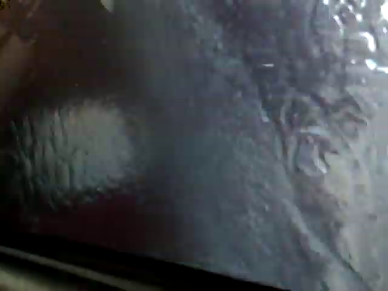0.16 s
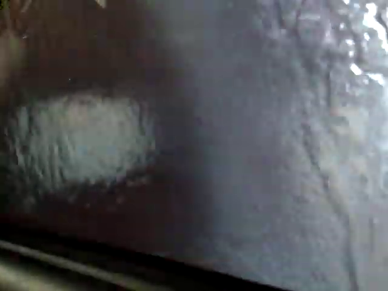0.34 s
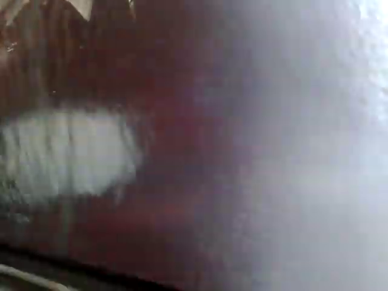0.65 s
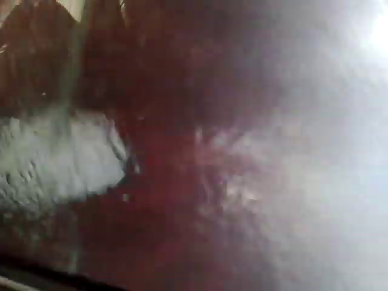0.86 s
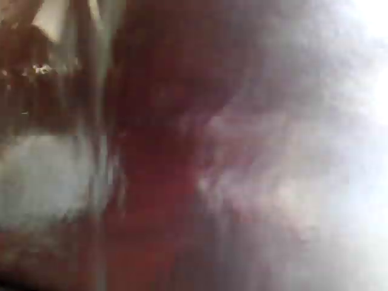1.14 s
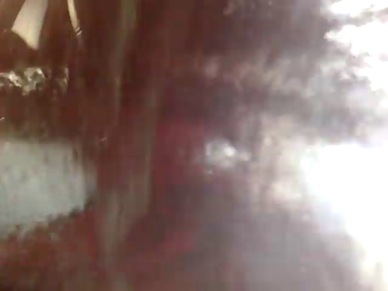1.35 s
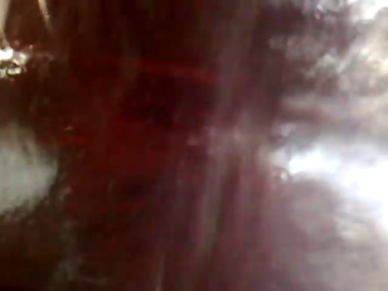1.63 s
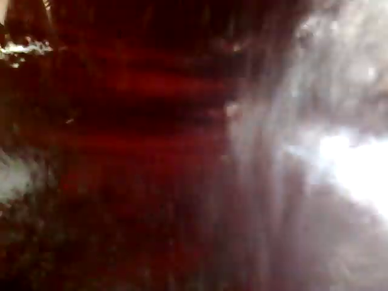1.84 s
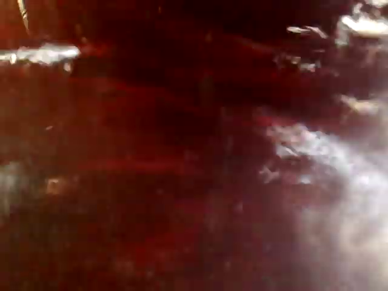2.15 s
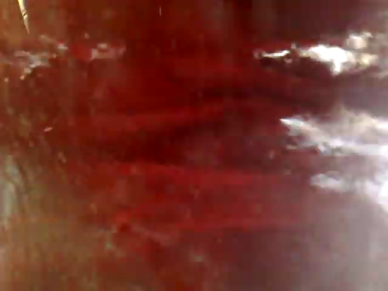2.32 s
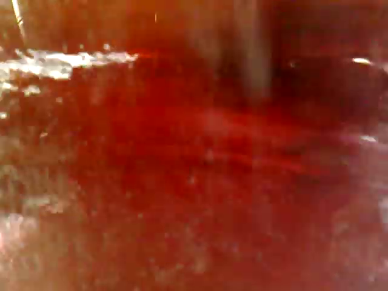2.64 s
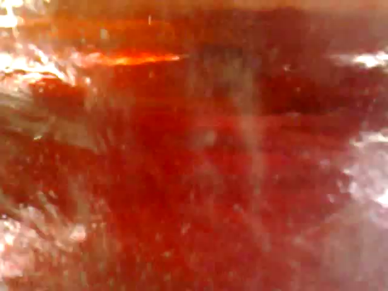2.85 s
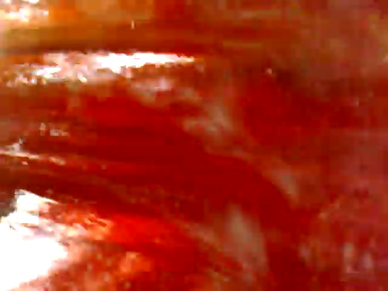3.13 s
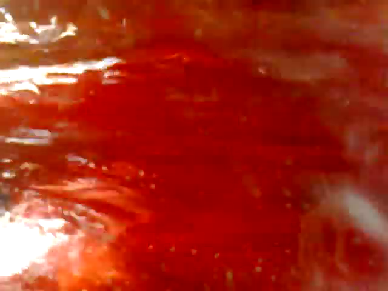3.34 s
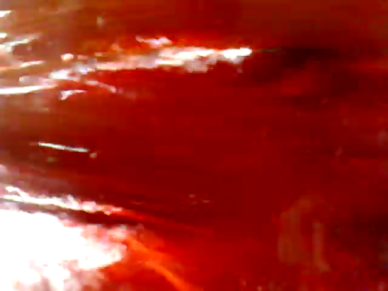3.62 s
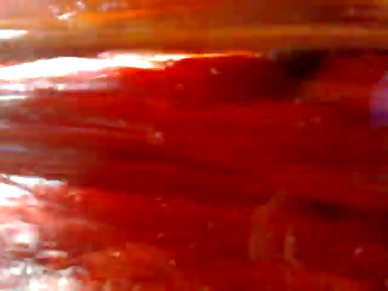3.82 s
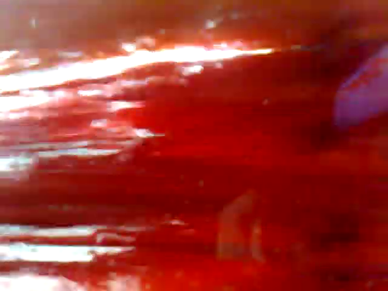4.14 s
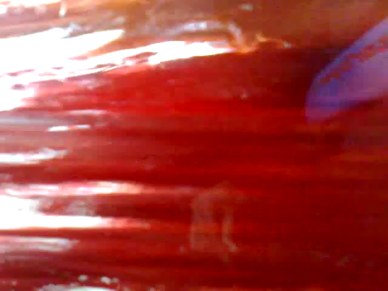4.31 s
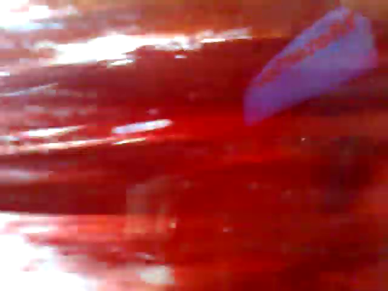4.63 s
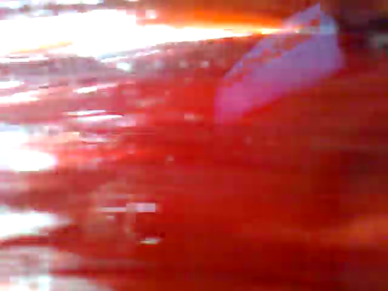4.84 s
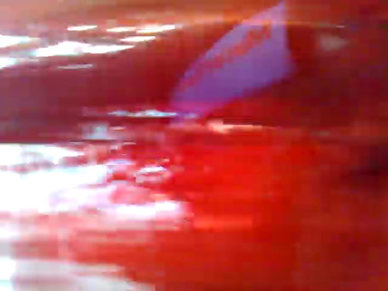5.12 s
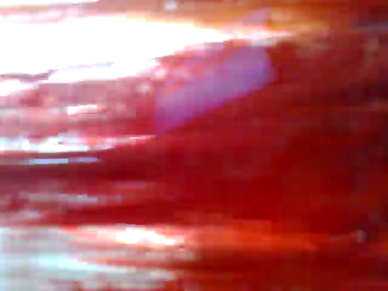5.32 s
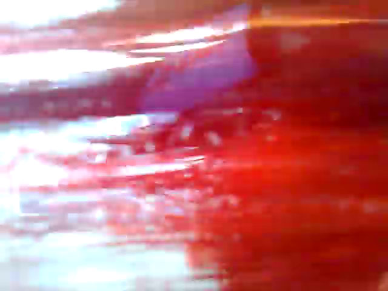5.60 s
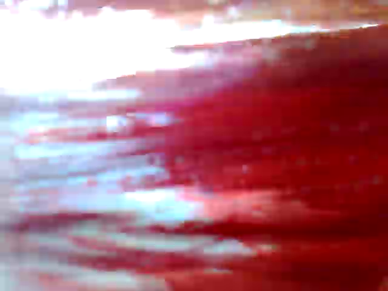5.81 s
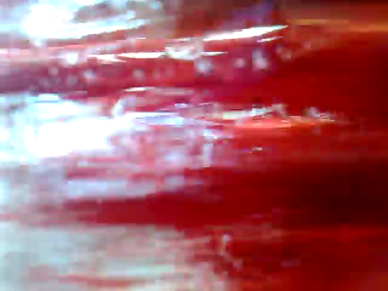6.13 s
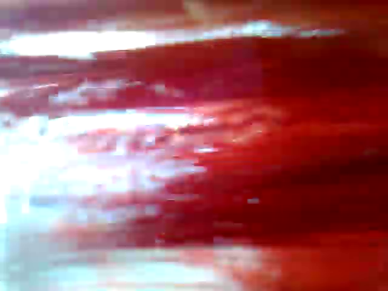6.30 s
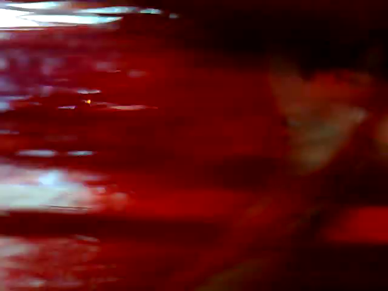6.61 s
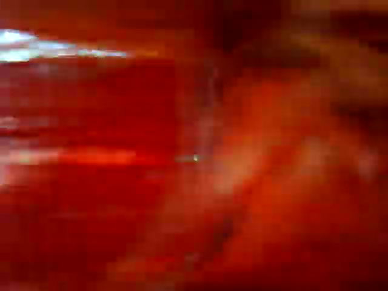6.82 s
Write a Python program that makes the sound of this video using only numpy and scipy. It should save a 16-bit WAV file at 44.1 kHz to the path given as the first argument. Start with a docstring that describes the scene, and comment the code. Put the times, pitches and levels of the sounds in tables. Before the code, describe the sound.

Inside a closed car in an automatic wash, heard through a small, overloaded, narrow-band microphone. A jet blasts the windscreen at first, with splashes and a low boom, until about 0.23 s, when the sound drops almost to silence, clicks faintly and swells back by 0.4 s. From then on it is a steady loud roar: cloth strips beating some twenty-two times a second, blurred into a flutter, drumming on doors and glass while heavy drops and fine spray pelt down. Panels groan in unsteady low tones around 0.7, 1.7, 2.7 and 3.4 s. The deep rumble and cabin boom grow heavier around 3.5 s, with another drone near 4.7 s. From about 5 s the roof rings more strongly, a higher hum wavers, and sharp splashes cluster from 5.7 to 6.7 s. The roar continues to the end, thinly crackling, with a stronger drone around 6.85 s.

```python
"""Inside a car wash

An automatic car wash heard from inside the car. Spinning cloth brushes, as hails of tiny blows, boom the cabin
and ring the panels; filtered hails of drops make the water, random noise the rumble, wavering tones the drones.
A small narrow-band recorder is overloaded by the din; the sound drops out once near the start and swells back."""
import sys
import numpy as np
from scipy import signal
from scipy.fft import rfft, irfft, next_fast_len
from scipy.io import wavfile
from scipy.ndimage import uniform_filter1d

SR = 44100
rng = np.random.default_rng(int(sys.argv[2]) if len(sys.argv) > 2 else 0)


def output_pcm(signal):
    """Save a mono or channel-first signal as 16-bit PCM at the path in sys.argv[1].

    Samples are clipped to [-1, 1] before scaling.
    """
    pcm = np.clip(np.atleast_2d(signal).T, -1, 1) * 32767
    wavfile.write(sys.argv[1], SR, np.round(pcm).astype(np.int16))


N = 306936
TIME = np.arange(N) / SR  # s

# Tone colour of fine spray and splashes on glass: f/Hz, relative level per Hz/dB
SPRAY_COLOUR = [(600, -16.5), (1200, 0.5), (1700, 0.5), (2100, 1.5), (2500, 0.5), (2900, 1.5), (3250, 4.5),
                (3600, -6), (5000, -6)]

# At first a jet plays straight on the windscreen and the brushes stand off: end in s, level changes in dB
JET_END_S = 0.25
JET_SPRAY_DB, JET_WASH_DB, JET_BOOM_DB, STAND_OFF_DB = 3, -2, 3.5, -4.5


def from_db(db):
    """Turn decibels into a plain multiplier."""
    return 10 ** (np.asarray(db) / 20)


def rms_one(x):
    """Scale a signal so that its average strength (rms) is 1."""
    return x / np.sqrt(np.mean(x ** 2) + 1e-20)


def in_time(rows):
    """Draw straight lines between the rows of a table, giving each column a value at every sample."""
    s, *columns = np.transpose(rows)
    return [np.interp(TIME, s, column) for column in columns]


def swell(middle, length):
    """Rise and fall once, smoothly, between 0 and 1; length is the whole hump in s."""
    return np.cos(np.pi * np.clip((TIME - middle) / length, -.5, .5))


def cycle(per_s, first_s):
    """Swing steadily between -1 and 1, with a peak at first_s."""
    return np.cos(2 * np.pi * per_s * (TIME - first_s))


def drift(rate):
    """Wander slowly at random with rms 1: noise smoothed twice above the rate in Hz."""
    step = 40  # samples between the slow values
    r = np.exp(-2 * step * np.pi * rate / SR)
    noise = rng.standard_normal(N // step + 2002)
    slow = signal.lfilter([1], [1, -2 * r, r * r], noise)[2000:]  # skip the filter's start
    return np.interp(np.arange(N) / step, np.arange(len(slow)), rms_one(slow))


def coloured(x, spectrum):
    """Filter a signal by a smooth curve of level against pitch, silent above its last row; rms 1."""
    hz, db = np.transpose(spectrum)
    size = next_fast_len(N)
    bins_hz = np.maximum(np.arange(size // 2 + 1) * SR / size, 1)
    gain = from_db(np.interp(np.log(bins_hz), np.log(hz), db, right=-100))
    return rms_one(irfft(rfft(x, size) * gain, size)[:N])


def impacts(per_s, spread_db):
    """Scatter a dense random hail of small blows of uneven size and either sign; rms 1."""
    sizes_db = spread_db * np.minimum(rng.exponential(1, N), 4)
    sizes = from_db(sizes_db) * rng.choice([-1, 1], N)
    return rms_one(sizes * (rng.random(N) < per_s / SR))


def resonate(x, hz, width):
    """Ring at one pitch; a narrower width in Hz rings longer."""
    r = np.exp(-np.pi * width / SR)
    feed = np.array([1, 0, -1]) * (1 - r * r) / 2
    return signal.lfilter(feed, [1, -2 * r * np.cos(2 * np.pi * hz / SR), r * r], x)


def panel(force, modes, skirt):
    """Ring several resonances side by side, a second, wider one taming the far sides of each; rms 1."""
    out = np.zeros(N)
    for hz, width, db in modes:
        # every blow lands somewhere else, so it drives each mode with a sign of its own
        ringing = resonate(force * rng.choice([-1, 1], N), hz, width)
        out += from_db(db) * resonate(ringing, hz, width * skirt)
    return rms_one(out)


def shell():
    """The car body rumbles under the weight of the brush, as deep noise that swells when the car is rocked."""
    # Colour of the rumble: f/Hz, relative level per Hz/dB
    rumble_colour = [(12, -12), (25, -4.5), (40, -8.5), (57, 1), (75, -6.5), (120, -18.5)]
    # Extra swells as the brush rocks the car: middle t/s, level/dB
    rocks = [(2.2, -25.5), (3.52, -28.5), (4.25, -32), (4.87, -27), (6.25, -32.5)]
    light_db, heavy_db = -35.5, -29.5  # before and after the brush bears on the car
    bears_on_s, bearing_s, rock_length_s = 3.5, 0.3, 0.4
    weight = .5 + .5 * np.tanh((TIME - bears_on_s) / bearing_s)
    jet = TIME < JET_END_S
    gain = from_db(light_db + weight * (heavy_db - light_db) + JET_BOOM_DB * jet)
    for middle, db in rocks:
        gain += from_db(db) * swell(middle, rock_length_s)
    return gain * coloured(rng.standard_normal(N), rumble_colour)


def water(slap, spray_db=-0.13, wash_db=3.0, wash_slap_db=1.3, spray_slap_db=0.52, flutter_db=0.75):
    """Heavy drops and fine spray pelt the glass as two coloured hails, thrown in pulses by the brush."""
    # Colour of the heavy drops: f/Hz, relative level per Hz/dB
    wash_colour = [(100, -17), (250, -4), (400, 4.5), (490, 2), (580, 0), (720, -0.5), (900, -0.5),
                   (1150, 0.5), (1350, -4), (1700, -7), (2500, -21.5), (4000, -32.5)]
    # Water sheeting down the glass, before the wash trim: t/s, level/dB
    sheeting = [(0.45, -13.5), (0.87, -15.5), (1.94, -15), (2.15, -15), (6.43, -16), (6.7, -14.5),
                (6.75, -18)]
    # Fine spray reaching the car, before the spray trim: t/s, level/dB
    flow = [(0.38, -18.5), (0.41, -18.5), (0.89, -21), (1.05, -18), (1.88, -19.5), (2.05, -18.5),
            (3.63, -19), (3.65, -21.5), (4.63, -18), (4.7, -20.5), (5.72, -17.5), (6.01, -18.5),
            (6.15, -17.5), (6.37, -20.5), (6.61, -18.5), (6.9, -19.5)]
    # Moments when the water lets up, or rises a touch where positive: middle t/s, change/dB
    lulls = [(5.81, -1), (5.98, -3.5), (6.38, 0.5), (6.87, -2.5)]
    lull_s = 0.13
    jet = TIME < JET_END_S
    surge_db = flutter_db * drift(24)
    for middle, db in lulls:
        surge_db += db * swell(middle, lull_s)
    wash_level_db = in_time(sheeting)[0] + wash_db + JET_WASH_DB * jet + wash_slap_db * slap
    wash = from_db(wash_level_db) * coloured(impacts(6000, 2.24), wash_colour)
    spray_level_db = in_time(flow)[0] + spray_db + JET_SPRAY_DB * jet + spray_slap_db * slap
    spray = from_db(spray_level_db) * coloured(impacts(7000, 2.47), SPRAY_COLOUR)
    return from_db(surge_db) * (wash + spray)


def splashes(rise_s=0.0011, decay_s=0.013, level_db=-6.0):
    """Single slugs of water burst on the window: spray noise that jumps up and dies at once."""
    # Slugs of water, before the common trim and the burst shape: start t/s, level/dB
    slugs = [(0.115, -2), (0.162, -2), (0.201, -2.5), (0.4357, -4), (0.628, -6), (2.731, -6.5), (2.774, -8),
             (3.3034, -8.5), (4.4154, -9), (5.685, -4.5), (5.725, -11), (5.87, -10), (5.905, -4.5),
             (6.131, -5.5), (6.43, -8.5), (6.548, -10.5), (6.674, -6)]
    burst = np.zeros(N)
    for start, db in slugs:
        age = np.maximum(TIME - start, 0)
        burst += from_db(db + level_db) * (1 - np.exp(-age / rise_s)) * np.exp(-age / decay_s)
    return burst * coloured(impacts(7000, 3.2), SPRAY_COLOUR)


def drones(waver=0.0231, rough_db=2.5, level_db=-1.5):
    """Dragging cloth sticks and slips, so a panel sings one tone, unsteady in pitch and strength."""
    # Singing panels, before the common trim: middle t/s, length/s, central f/Hz, level/dB
    drags = [(0.681, 0.7, 260.4, -16.5), (1.6, 0.6, 146.8, -16.5), (1.798, 0.4, 275.8, -14.5),
             (2.747, 0.56, 148, -19), (3.399, 1, 141.9, -19), (3.4, 1, 98.8, -24),
             (4.687, 0.47, 116, -19.5), (6.148, 1.5, 333.1, -16), (6.85, 0.33, 318.6, -11.5)]
    out = np.zeros(N)
    for middle, length, hz, db in drags:
        phase = 2 * np.pi * np.cumsum(hz * (1 + waver * drift(10.0))) / SR
        tone = np.sqrt(2) * np.sin(phase + rng.uniform(0, 2 * np.pi))
        grip_db = rough_db * drift(hz / 20)  # the grip changes over some twenty cycles
        out += from_db(db + level_db + grip_db) * swell(middle, length) * tone
    return out


def brushes(slap, slap_db=1.2, boom_db=-1.0, roof_db=-0.5, glass_db=-0.76, roof_contrast=1.17,
            roof_full_db=-8.5):
    """Cloth tips set the cabin booming and hammer the doors, roof and glass, which ring at their own pitches."""
    # Colour of the cabin boom: f/Hz, relative level per Hz/dB
    boom_colour = [(50, -27), (75, -13.5), (98, -2), (120, -5.5), (150, -12.5), (250, -41)]
    # Resonances of each panel: f/Hz, width/Hz, relative level/dB
    door_modes = [(149.4, 31.7, -2), (191.3, 79, -2.5), (246.2, 74, 0)]
    roof_modes = [(307.5, 35, -6), (329.3, 42, 2), (391.6, 30, -5.5), (478, 90, -12.5), (912, 130, -13.5)]
    glass_modes = [(514, 60, -5), (660, 85, -2.5), (705, 66, 2), (793, 33, -5.5), (1184, 78, -9.5)]
    # Course of each part, before the trims: t/s, level/dB
    lean = [(0.55, -26), (1.98, -28.5), (2.02, -21.5), (3.63, -18), (4.37, -22.5), (4.39, -29), (4.65, -18),
            (4.99, -22.5), (6.74, -24), (6.9, -22)]  # the brush leans on the car and the cabin booms
    drumming = [(0.38, -11), (1.92, -9.5), (2.32, -18.5), (2.36, -15), (3.74, -11.5), (4.45, -15.5),
                (4.79, -12), (6.12, -20), (6.17, -15), (6.9, -20.5)]  # the cloth on the doors, working its way to the roof
    ringing = [(0.38, -16.5), (1.9, -16.5), (2.07, -19), (4.21, -12), (4.25, -18), (5.94, -8.5),
               (6.74, -10.5), (6.9, -9.5)]  # the cloth on the roof
    scrub = [(0.38, -12.5), (1.36, -12), (1.38, -13), (2.41, -19.5), (2.61, -12), (5.37, -17.5),
             (5.81, -21.5), (6.75, -17.5), (6.9, -21.5)]  # the cloth on the glass
    jet = TIME < JET_END_S
    beat = from_db(slap_db * slap)
    boom = from_db(in_time(lean)[0] + boom_db) * coloured(impacts(3000, 3.4) * beat, boom_colour)
    door = from_db(in_time(drumming)[0]) * panel(impacts(3000, 0.88) * beat, door_modes, skirt=2.8)
    # stretch the roof's ups and downs around its full level
    ringing_db = roof_full_db + roof_contrast * (in_time(ringing)[0] - roof_full_db)
    roof = from_db(ringing_db + roof_db) * panel(impacts(3000, 0.79) * beat, roof_modes, skirt=4.2)
    glass = from_db(in_time(scrub)[0] + glass_db) * panel(impacts(5000, 1.0) * beat, glass_modes, skirt=4.0)
    return from_db(JET_BOOM_DB * jet) * boom + from_db(STAND_OFF_DB * jet) * (door + roof + glass)


def scene():
    """Add all sources; brushes and water share the beat of the rows of cloth strips."""
    slap = cycle(22.45, 0.015)  # rows landing per s, first peak in s
    return (shell() + water(slap) + splashes() + drones() + brushes(slap))[None]


def tick(tick_db=-28.0, width_s=0.00007):
    """One thin click as the sound swells back: a single swing of pressure down and up."""
    age = (TIME - 0.292) / width_s
    return from_db(tick_db) * 2 * age * np.exp(-age ** 2)


def record(dry, drive_db=3.0, input_top=3.2, output_top=1.14, mirror_db=-51.0, hiss_db=-56.0, flicker_db=1.5):
    """The input overloads, the band is narrowed, and the output rounds and clips peaks into a thin crackle."""
    # The brief drop-out: t/s, gain (1 = full)
    dropout = [(0, 1), (0.222, 1), (0.241, 0.004), (0.259, 0.004), (0.26, 0.04), (0.32, 0.42), (0.40, 1)]
    # Colour of the faint hiss above the narrow band: f/Hz, relative level per Hz/dB
    hiss_colour = [(3000, -9.5), (6000, 0), (9000, -1), (12000, -8), (16000, -4), (17000, -4.5)]
    voice_band_hz, image_hz, cutoff_hz = 3480, 16000, 17000
    gain = in_time(dropout)[0]
    loud = input_top * np.tanh(from_db(drive_db) * dry / input_top)
    voice_filter = signal.ellip(10, .3, 70, voice_band_hz, fs=SR, output="sos")
    narrow = signal.sosfilt(voice_filter, loud)
    out = np.clip(output_top * np.tanh(narrow * gain / output_top), -1, 1)
    # coarse resampling mirrors a faint copy of the sound into the top treble
    one_sided = signal.hilbert(out, next_fast_len(N))[:, :N]
    mirror = np.real(one_sided * np.exp(-2j * np.pi * image_hz * TIME))
    # a faint hiss rides on the level and flickers
    level = np.sqrt(uniform_filter1d(out ** 2, size=256) + 1e-9)
    flicker = from_db(flicker_db * drift(25))
    hiss = rms_one(level) * flicker * coloured(rng.standard_normal(N), hiss_colour)
    out = out + from_db(mirror_db) * mirror + from_db(hiss_db) * hiss + tick()
    top_filter = signal.ellip(10, .1, 80, cutoff_hz, fs=SR, output="sos")
    return signal.sosfilt(top_filter, out)


dry = scene()
out = record(dry)
output_pcm(out)
```